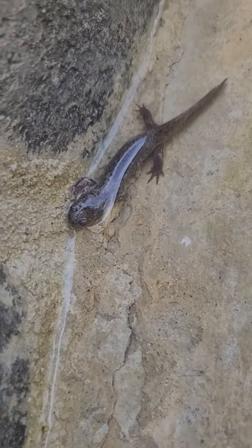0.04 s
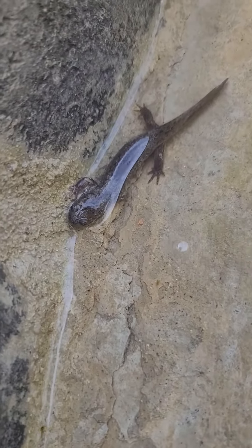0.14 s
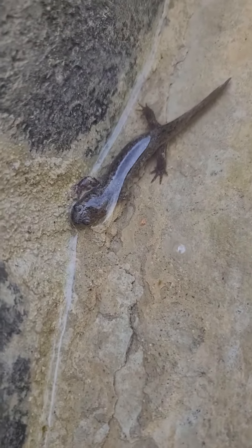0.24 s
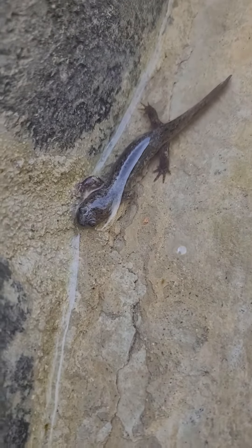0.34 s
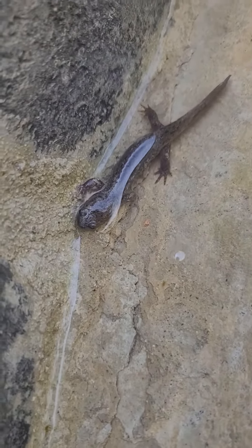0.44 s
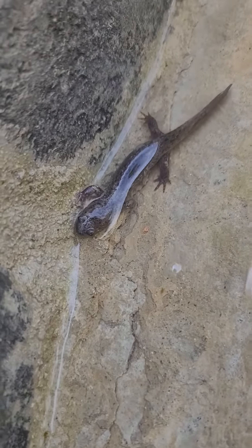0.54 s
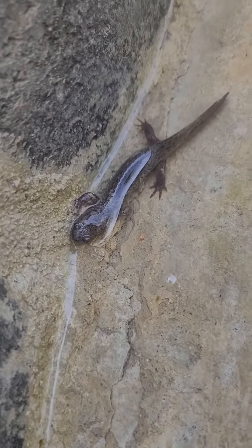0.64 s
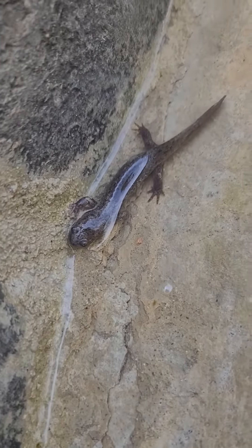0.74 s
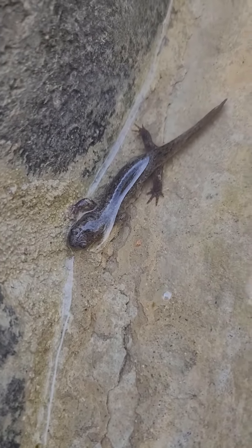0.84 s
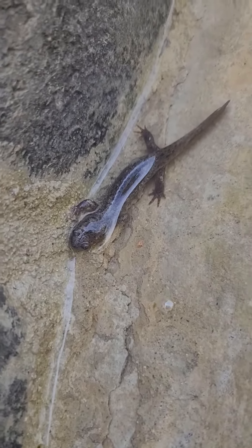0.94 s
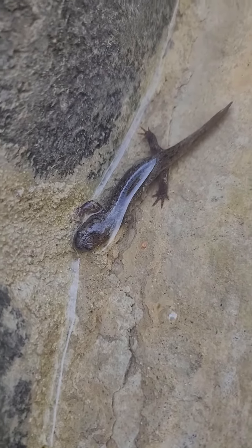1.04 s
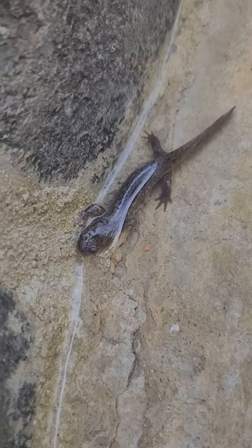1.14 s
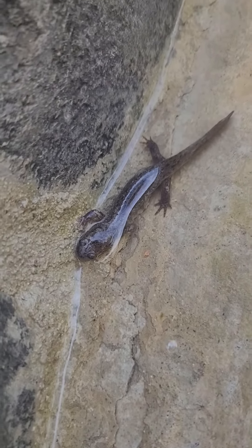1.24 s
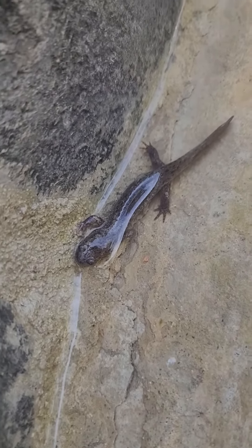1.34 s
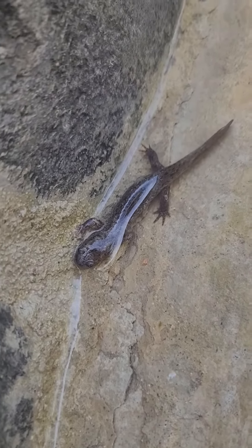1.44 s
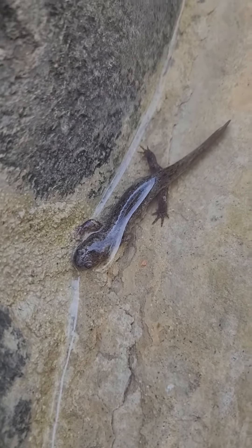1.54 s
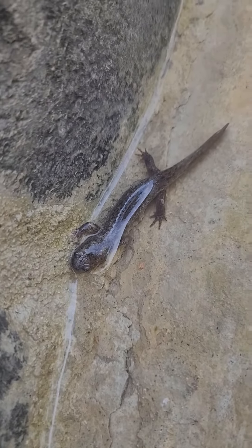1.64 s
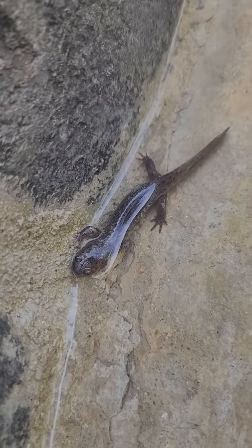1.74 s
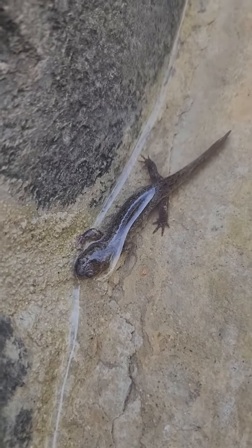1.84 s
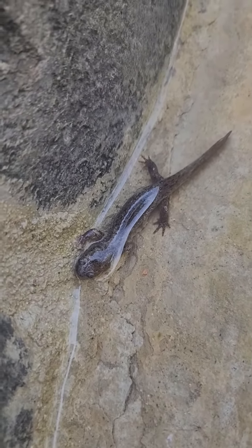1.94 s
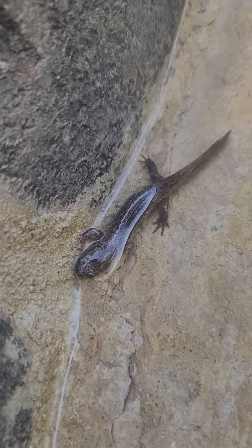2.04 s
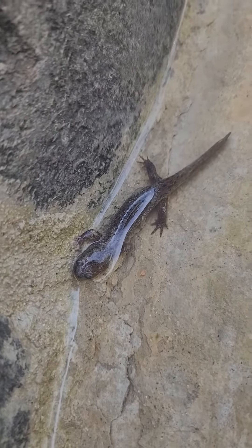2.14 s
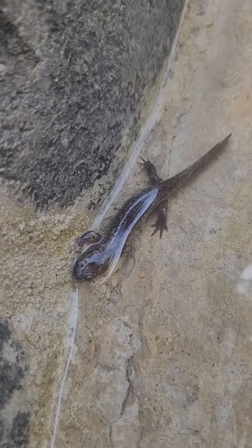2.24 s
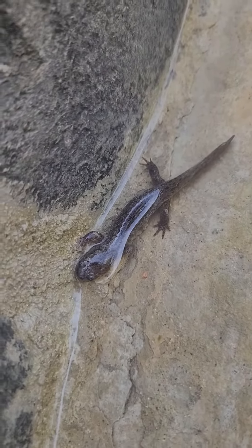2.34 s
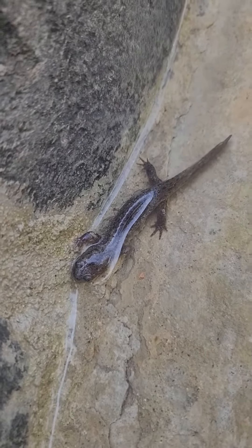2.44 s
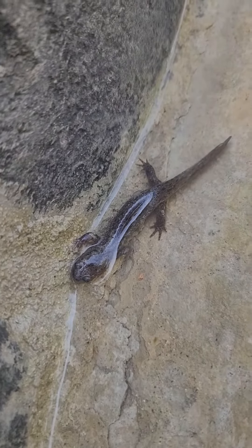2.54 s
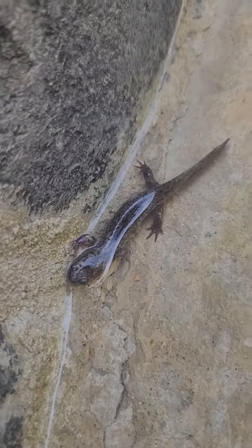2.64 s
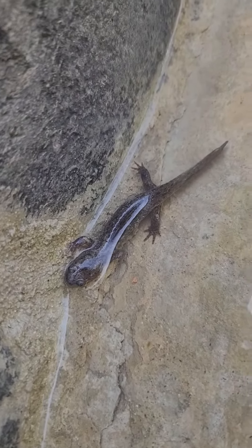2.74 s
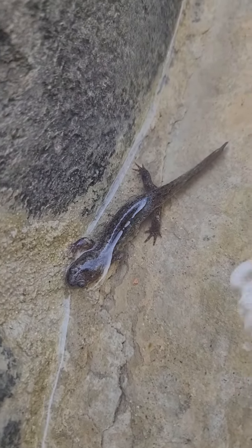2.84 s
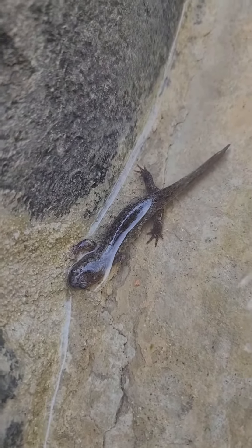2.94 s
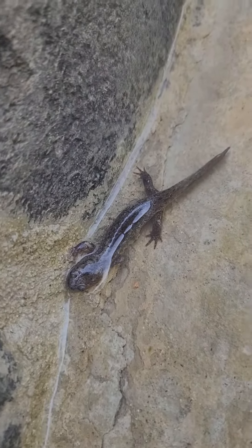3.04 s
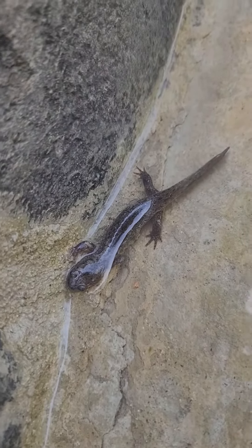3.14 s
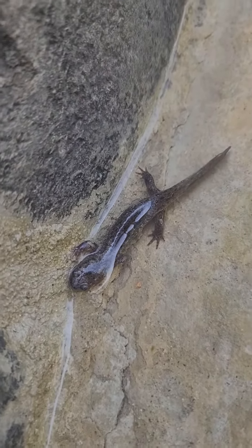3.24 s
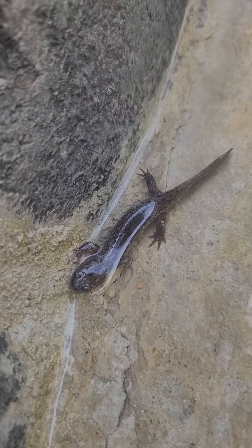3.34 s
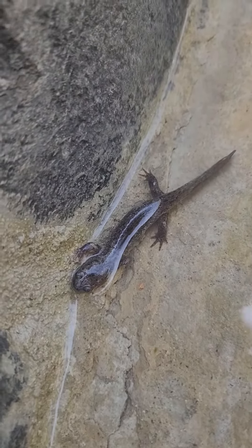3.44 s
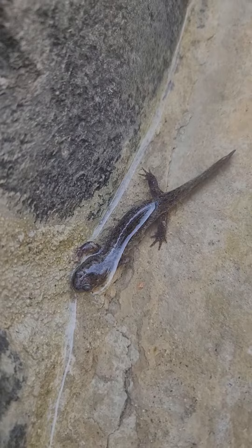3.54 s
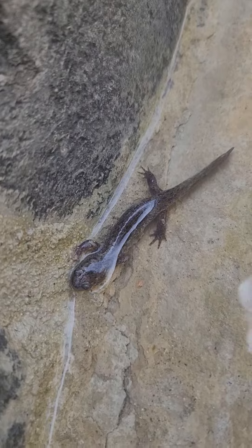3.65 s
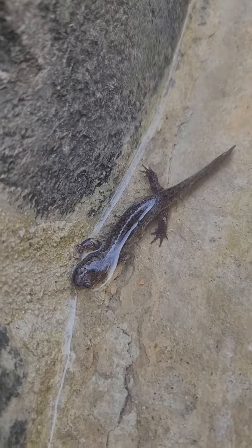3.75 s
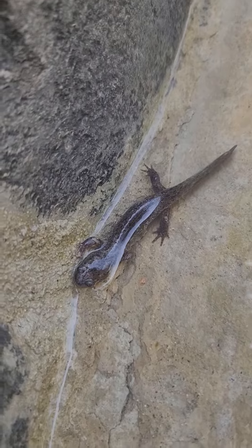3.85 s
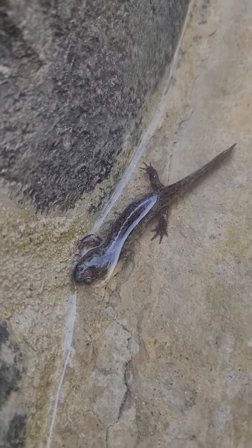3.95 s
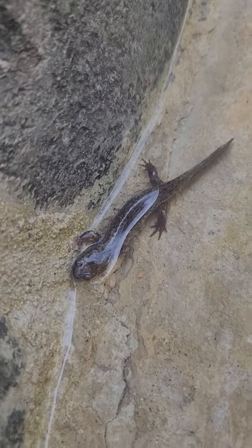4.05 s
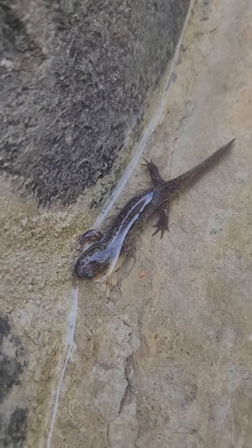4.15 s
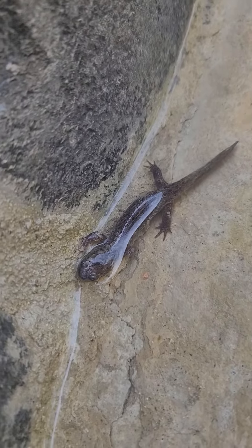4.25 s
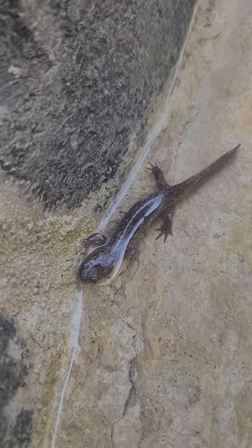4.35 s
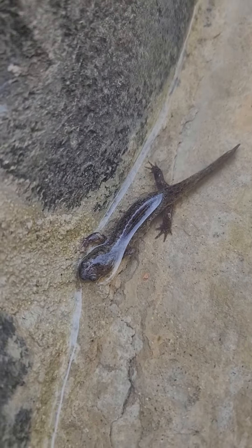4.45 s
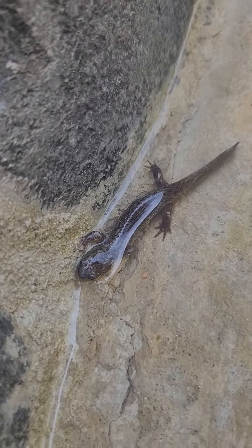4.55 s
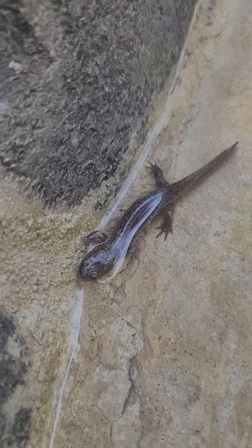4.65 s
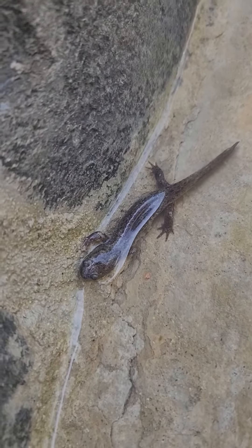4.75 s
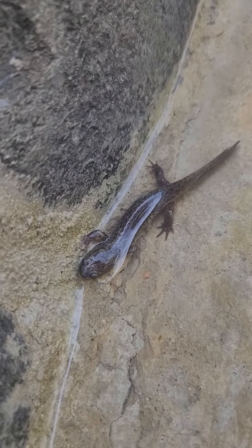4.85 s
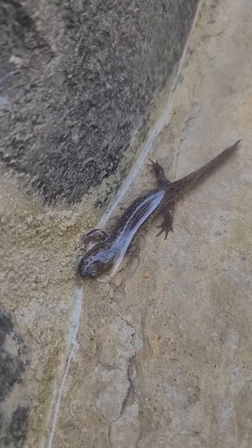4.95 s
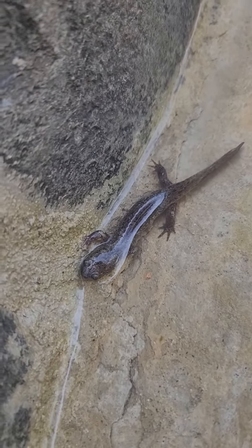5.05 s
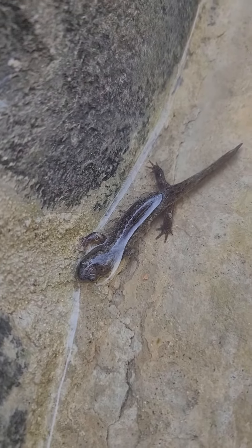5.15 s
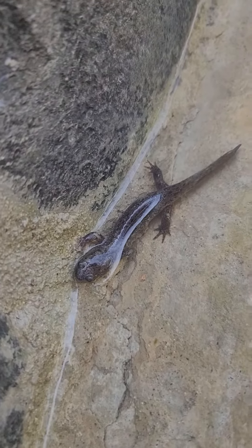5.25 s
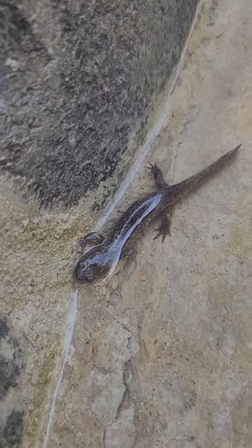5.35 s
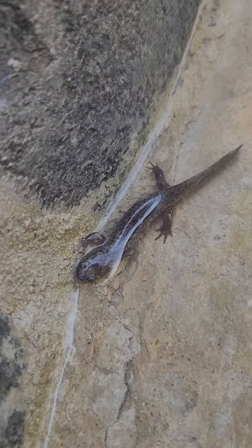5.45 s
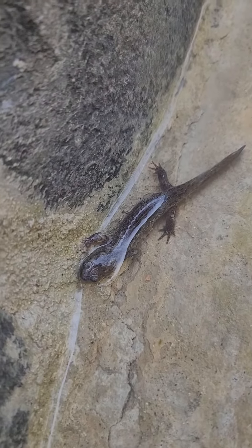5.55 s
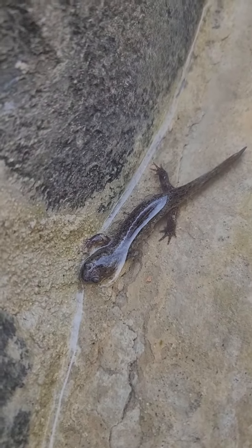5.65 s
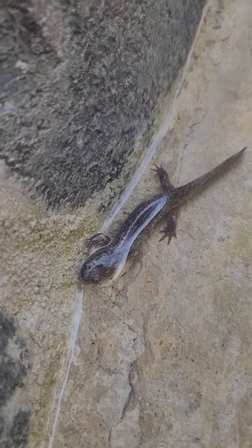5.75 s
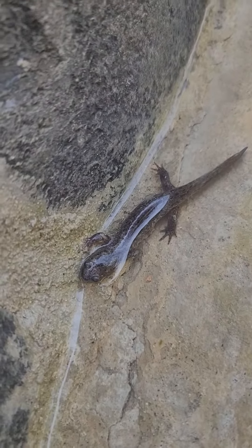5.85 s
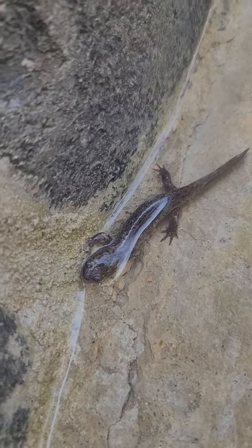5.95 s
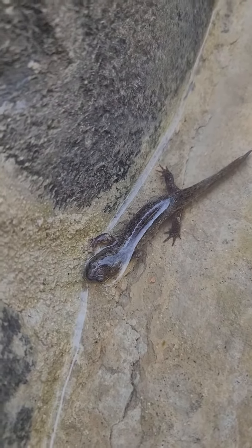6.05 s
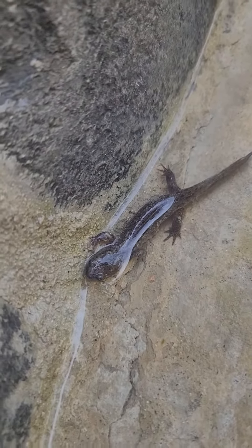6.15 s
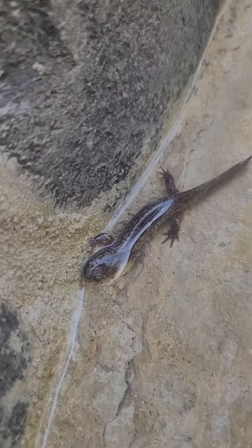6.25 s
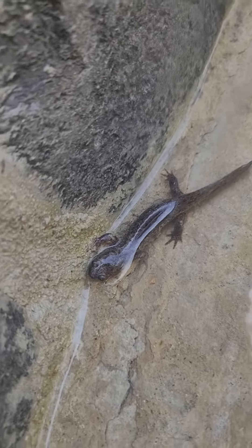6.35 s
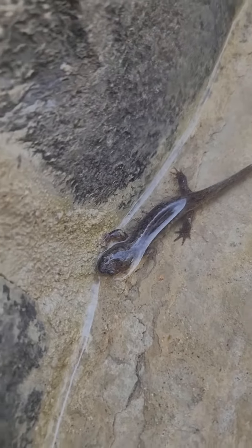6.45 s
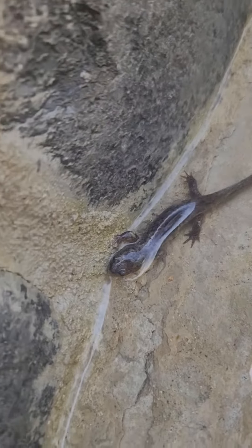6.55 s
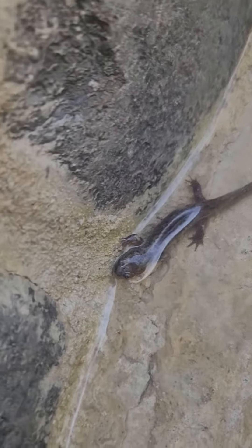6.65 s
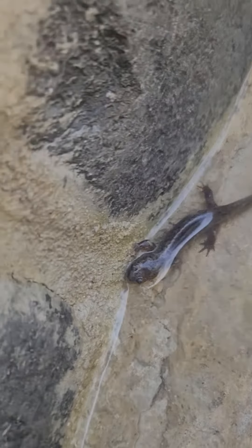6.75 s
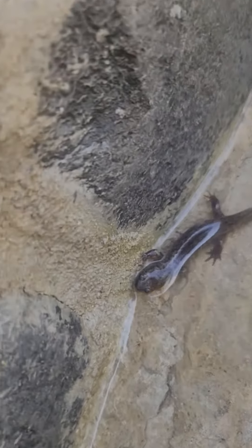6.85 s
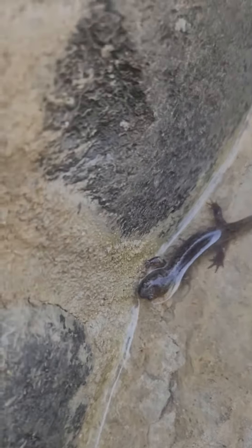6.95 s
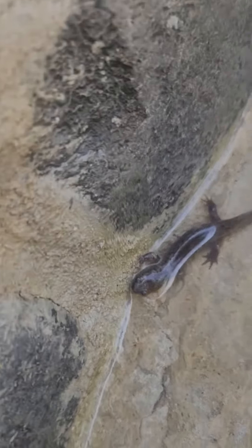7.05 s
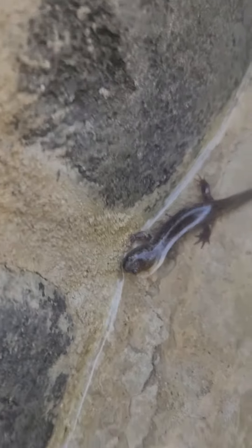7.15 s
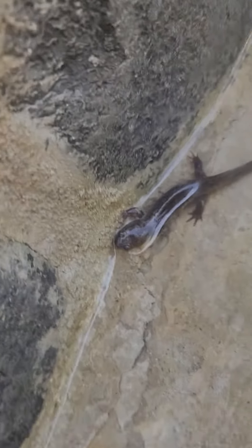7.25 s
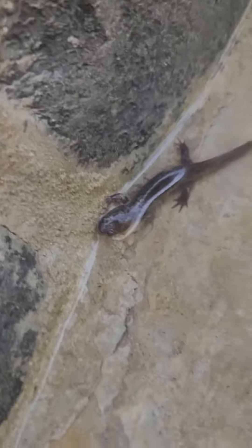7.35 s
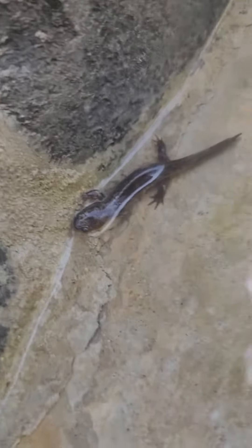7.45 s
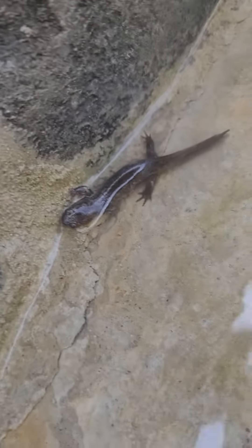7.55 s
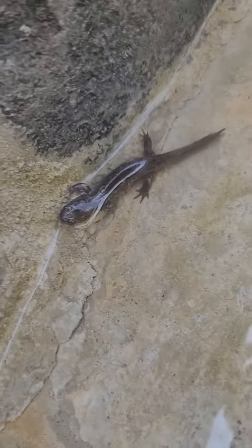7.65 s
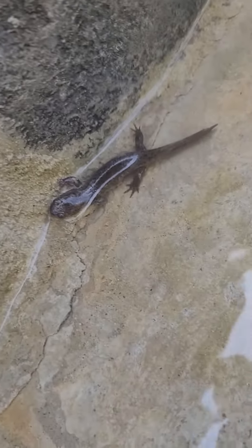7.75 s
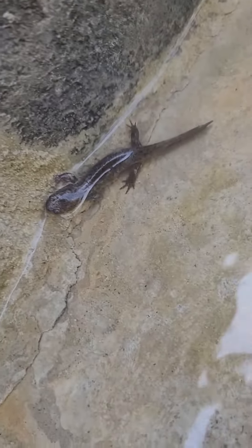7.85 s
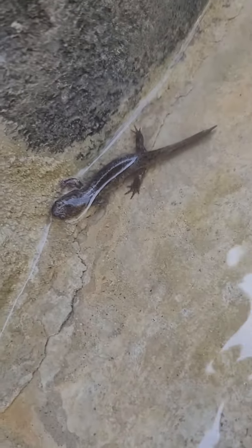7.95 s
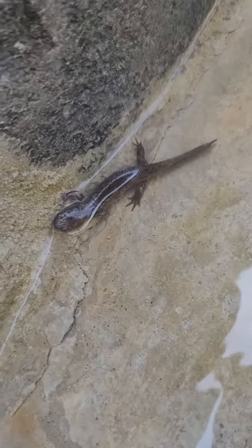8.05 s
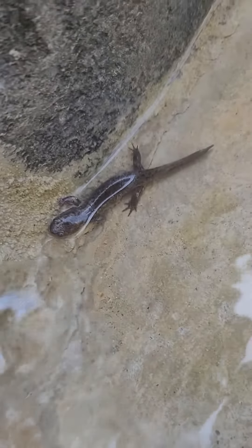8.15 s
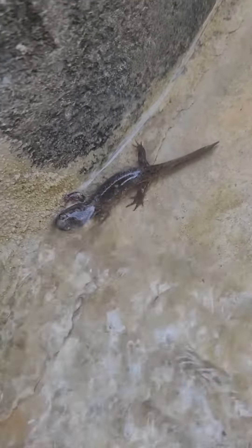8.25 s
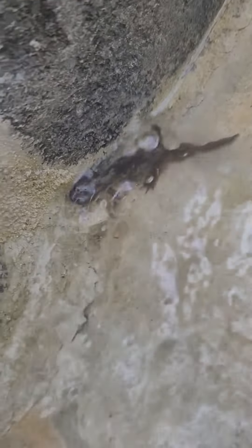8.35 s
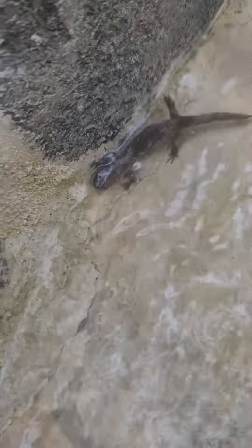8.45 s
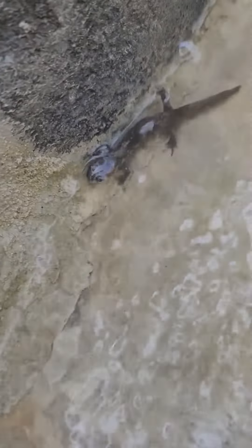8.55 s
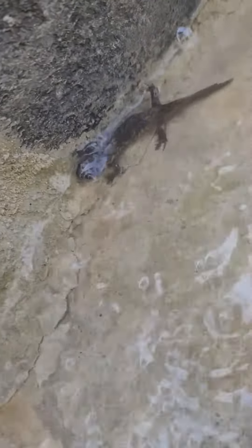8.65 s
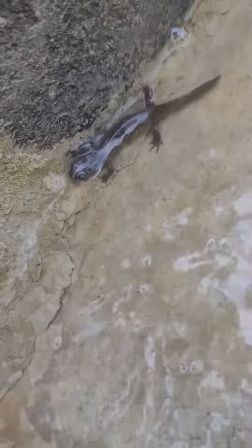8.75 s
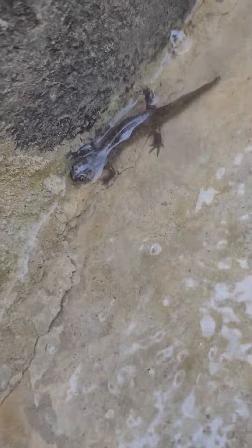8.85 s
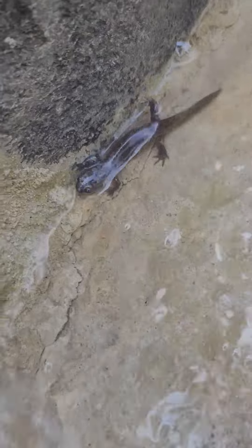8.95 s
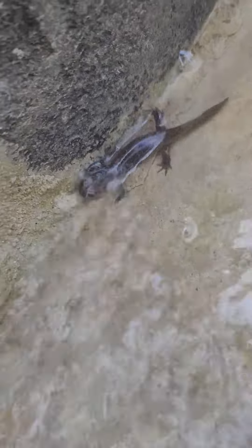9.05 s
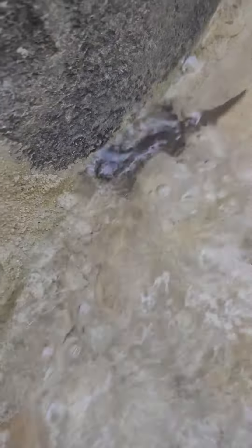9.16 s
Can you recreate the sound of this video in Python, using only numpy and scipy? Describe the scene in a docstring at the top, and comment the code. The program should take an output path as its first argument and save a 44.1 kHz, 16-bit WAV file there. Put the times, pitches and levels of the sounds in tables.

```python
"""Beside a shallow pool under a rock: a spring trickles in some steps away, before far water and moving air.
Drops are ringing sine bubbles with noise ticks and bursts; a near and a far bird sing in gliding whistles.
Cloth hiss swishes near the right port, then two handfuls of water are pushed over the stone, close by:
spray noise, a gurgle of bubbles and one big gulp. A hand-held two-port microphone hears level and delay."""
import sys
import numpy as np
from scipy import signal
from scipy.fft import rfft, irfft, next_fast_len
from scipy.io import wavfile
from scipy.ndimage import uniform_filter1d, map_coordinates

SR = 44100
rng = np.random.default_rng(int(sys.argv[2]) if len(sys.argv) > 2 else 0)


def waveform_to_disk(signal):
    """Save audio, clipped to [-1, 1], as 16-bit WAV at the path in sys.argv[1]."""
    frames = np.transpose(np.atleast_2d(signal))
    scaled = np.clip(frames, -1, 1) * 32767
    samples = np.round(scaled).astype(np.int16)
    wavfile.write(sys.argv[1], SR, samples)


N = 406161

# Far water and air, the part both ports share: f/Hz, relative level/dB [Hz, dB]
STREAM_SHARED = [(15, -47), (30, -23), (75, -1), (200, -1.5), (285, -8), (400, -4), (720, -12), (1000, -22),
                 (1300, -15), (5600, -34), (6900, -24.5), (9500, -42), (16000, -40)]
# Far water and air, the part opposed between the ports: f/Hz, relative level/dB [Hz, dB]
STREAM_OPPOSED = [(15, -50), (25, -4.5), (157, -11), (641, 1), (962, -7.5), (2160, -13.5), (5280, -25.5),
                  (8590, -82), (16000, -66)]
# Puffs of air on the ports: t/s at the middle, level/dB [s, dB]
AIR_PUFFS = [(.89, -57.5), (5.77, -49.5)]
# Colour of the air on the ports: f/Hz, relative level/dB [Hz, dB]
AIR_COLOUR = [(15, -39), (45, 19.5), (90, 21.0), (160, -35), (300, -90)]

# Scatter off wet rock: f/Hz, time to fall 60 dB/s [Hz, s]
ROCK_DECAY = [(500, 0.074), (2500, 0.1), (10000, 0.038)]
# Reverberation among the trees, for the far bird alone and for both: f/Hz, time to fall 60 dB/s [Hz, s]
FAR_TREE_DECAY = [(6000, .2)]
TREE_DECAY = [(3000, 0.42), (7000, 1.0)]

# Bubbles left by single drops: t/s, level/dB before churn, f/Hz, life/s [s, dB, Hz, s]
DROP_BUBBLES = [(0.3786, -45, 3530, 0.0038), (0.4294, -40, 2010, 0.0036), (0.647, -35, 1850, 0.0051),
                (0.667, -40, 2420, 0.0071), (0.696, -43, 2230, 0.0036), (0.766, -44, 3600, 0.0071),
                (0.9825, -43, 2350, 0.0049), (1.0702, -44.5, 2460, 0.0078), (1.2269, -33.5, 1824, 0.0042),
                (1.3682, -37, 2290, 0.004), (2.3256, -45, 2120, .004), (2.591, -46, 1640, 0.0077),
                (2.928, -44, 3040, 0.0029), (2.988, -43, 2180, 0.004), (3.038, -30, 2330, 0.002),
                (3.194, -47, 1973, 0.015), (3.229, -32, 2120, 0.0019), (3.569, -38.5, 4690, 0.0062),
                (3.785, -45, 4620, 0.0054), (3.831, -48, 3125, 0.0071), (3.8868, -49, 1930, 0.0049),
                (3.976, -46, 2140, 0.0032), (4.169, -43, 2400, 0.004), (4.2315, -40.5, 2140, 0.0049),
                (4.416, -38.5, 2130, 0.0043), (4.6934, -38, 2160, 0.0028), (5.0115, -45, 2250, 0.0054),
                (5.0793, -45, 3570, 0.0044), (5.383, -39.5, 2200, 0.0069), (5.392, -43.5, 1363, 0.021),
                (5.632, -36, 2370, 0.0022), (5.992, -28.5, 2340, 0.0028), (6.576, -40, 1475, 0.014),
                (7.954, -28, 3844, 0.0067), (7.964, -29.5, 1360, 0.012), (7.978, -16, 4070, 0.0015),
                (7.9967, -31.5, 2640, 0.0046), (8.004, -36, 1410, .012), (8.066, -25.5, 2180, 0.012),
                (8.066, -16, 750, 0.0075), (8.122, -29.5, 913, 0.015), (8.144, -23, 3150, 0.0084),
                (8.083, -29, 2950, .005), (8.111, -32, 2320, 0.0044), (8.123, -36, 2820, 0.015),
                (8.17, -31, 1410, 0.0091), (8.1801, -10.5, 1066, 0.0038), (8.1815, -10, 2796, 0.0047),
                (8.2411, -30.5, 2900, 0.0053), (8.252, -35, 1520, 0.0071), (8.295, -44.5, 1303, 0.017),
                (8.6032, -23, 1326, 0.0053), (8.696, -13, 2340, 0.001), (8.7262, -12.5, 3810, 0.0017),
                (8.835, -21, 2900, .0027), (8.85, -22.5, 1526, 0.0056), (8.86, -22, 4040, 0.0043),
                (8.9134, -23, 790, 0.0047), (8.947, -28, 3760, 0.0045), (9.016, -25, 4500, .004),
                (9.02, -22, 690, 0.0098), (9.049, -21, 654, 0.0042), (9.032, -13.5, 3220, 0.003),
                (9.055, -20, 2540, 0.0046), (9.066, -17.5, 1820, 0.0048), (9.073, -19, 4370, .003),
                (9.078, -27, 2850, 0.0035), (9.106, -24.5, 1500, 0.0079), (9.176, -34, 3000, .006),
                (9.1641, -28, 4180, 0.0057)]
# Short bursts of noise, mostly drops, a few at the near bird's high strokes:
# t/s, level/dB before crest and colour, band centre f/Hz [s, dB, Hz]
SHORT_BURSTS = [(0.1292, -41, 5300), (0.375, -42, 5730), (0.4595, -38.5, 6100), (0.619, -33.5, 4460),
                (0.7006, -39, 8000), (0.7547, -38.5, 7250), (0.883, -37, 4140), (1.04, -41, 6450),
                (1.54, -38.5, 6800), (1.709, -44, 7350), (1.937, -43.5, 6570), (1.996, -43, 6700),
                (2.0608, -35, 5550), (2.199, -42, 6750), (2.322, -42, 9000), (2.402, -37, 7540),
                (2.6706, -44, 7360), (2.791, -39, 6832), (2.846, -30, 6600), (2.923, -39.5, 6500),
                (3.0405, -38, 6300), (3.127, -37.5, 6060), (3.165, -32.5, 5830), (3.281, -36, 5000),
                (3.569, -36, 5200), (4.2391, -43, 7200), (4.478, -37.5, 6100), (4.6726, -34, 7940),
                (4.735, -33.5, 6900), (4.898, -37, 5470), (5.0285, -41.5, 6700), (5.69, -35, 5160),
                (5.9183, -36, 7560), (6.0552, -31, 6860), (7.308, -37, 6260), (7.707, -23.5, 5700),
                (8.078, -31, 5790), (8.1386, -30.5, 6656), (8.1801, -15, 3600), (8.328, -30.5, 7040),
                (8.602, -37, 5830), (8.6944, -27, 5060), (8.7167, -25, 4430), (8.86, -28, 4700),
                (8.978, -23.5, 3000), (8.27, -36, 6200), (8.428, -36, 4740), (8.483, -37.5, 6500),
                (9.031, -32, 6850), (9.0906, -21.5, 8240), (9.06, -23.5, 6500), (9.077, -28, 7340),
                (9.107, -27, 5500), (9.135, -34, 4850), (8.2, -27, 8000), (8.151, -29, 8900),
                (0.209, -42, 3700), (3.648, -42, 7050), (3.739, -40, 6650), (4.54, -46, 5300)]
# Colour of every burst; the microphone's port lifts 7 kHz: f/Hz, gain/dB [Hz, dB]
BURST_COLOUR = [(600, -15), (1500, 10), (4500, 3), (6900, 7.5), (8500, -0.5), (14000, 8.5), (16000, -22.5)]

# Far bird's thin notes: t/s, level/dB before flutter and placing [s, dB]
FAR_NOTES = [(4.266, -56), (4.449, -54), (4.615, -53), (4.786, -55), (4.94, -72)]
# Near bird's strokes: length/s, turn as part of the stroke, first f/Hz, turn f/Hz, last f/Hz,
# level/dB before throat, fade and flutter, list of starts t/s [s, 0-1, Hz, Hz, Hz, dB, s]
NEAR_PHRASE = [(.036, .4, 4600, 4250, 3900, -47, [1.283, 5.241]),
               (.095, .24, 3550, 3960, 3850, -35, [1.338, 5.294]),
               (.092, .4, 5150, 5520, 4450, -47, [1.61, 5.61]),
               (.03, .45, 7900, 7750, 7250, -49, [1.76, 1.895, 5.78, 5.917]),
               (.012, .5, 3900, 4150, 4450, -47, [1.789, 1.922, 5.809, 5.944]),
               (.044, .8, 3340, 4060, 4700, -38.5, [1.801, 1.934, 5.821, 5.956]),
               (.045, .55, 7340, 5660, 5190, -55, [2.05, 6.053]),
               (.104, .25, 4800, 4130, 2950, -37.5, [2.13, 6.146]),
               (.018, .7, 4250, 4800, 5200, -44, [2.481, 6.478]),
               (.036, .3, 5200, 3900, 3900, -40, [2.494, 6.491]),
               (.028, .6, 3280, 3400, 4020, -42, [2.532, 6.529])]
# What the near bird's throat favours: f/Hz, gain/dB [Hz, dB]
THROAT_COLOUR = [(2500, -12), (3200, -8), (4000, 1.5), (5500, -1.5), (8000, 4)]

# A sleeve slides: start t/s, length/s, stroke level/dB [s, s, dB]
SLEEVE_STROKES = [(6.58, 0.8, -49.5), (7.348, 0.44, -53.5)]
# Colour of the cloth: f/Hz, relative level/dB [Hz, dB]
CLOTH_COLOUR = [(130, -16), (220, -3.5), (293, -5), (398, 3), (941, -19), (3240, -12), (6890, -17),
                (14600, -28), (16000, -42)]

# Colour of pushed spray: f/Hz, relative level/dB [Hz, dB]
SPRAY_COLOUR = [(240, -31), (400, -28), (730, -17.5), (1490, -11), (2250, -6.5), (13700, -19), (16000, -24)]
# Handfuls of water: t/s at full flow, hold/s, flow gain/dB before the drain adds to it [s, s, dB]
HANDFULS = [(8.096, 0.089, -33.5), (9.023, 0.055, -28)]
# The hand settles on stone: t/s, level/dB, f/Hz, life/s [s, dB, Hz, s]
HAND_KNOCKS = [(7.478, -34, 417, 0.005), (7.4945, -33.5, 378, 0.005)]
# Air pockets squeezed or stretched by the water: t/s, length/s, first f/Hz, last f/Hz,
# level/dB before roughening [s, s, Hz, Hz, dB]
SLIDING_POCKETS = [(8.047, 0.024, 964, 1410, -27.5), (8.866, 0.023, 1664, 2330, -29.5),
                   (8.924, 0.0345, 1307, 696, -28), (8.978, 0.068, 1650, 1200, -26)]
# One big pocket of air closes slowly: t/s, level/dB, f/Hz, life/s [s, dB, Hz, s]
BIG_POCKET = [(9.05, -3.5, 1234, 0.0353)]

SPRING_AT, HAND_AT = (3.4, -0.565), (-3.5, 0.56)  # places: left over right in dB, left lag in ms
HAND_IN_S = 7.6  # listed bubbles and bursts after this belong to the pushed water
IMPACT_DB, HAND_IMPACT_DB = 1.5, -6.5  # tick against its bubble: spring, pushed water
TOP_HZ = 15600  # band limit


def amp(db):
    """Decibels to linear gain."""
    return 10 ** (np.asarray(db) / 20)


def unit(x):
    """Scales to rms 1."""
    return x / np.sqrt(np.mean(x ** 2) + 1e-20)


def along(points, hz):
    """Reads (Hz, value) points on a log frequency axis."""
    f, v = np.transpose(points)
    return np.interp(np.log(hz + 1), np.log(f + 1), v)


def wobble(rate):
    """A smooth random curve with rate knots a second."""
    knots = rng.standard_normal(int(N * rate / SR) + 4)
    return map_coordinates(knots, [np.arange(N) * rate / SR])


def filtered(x, response):
    """Multiplies the spectrum of x by a complex response of frequency."""
    m = next_fast_len(N + SR // 2)
    return irfft(rfft(x, m) * response(np.fft.rfftfreq(m, 1 / SR)), m)[..., :N]


def hiss(colour, patchy_db):
    """Coloured noise of rms 1, with patches of random gain in time and frequency."""
    z = signal.stft(rng.standard_normal(N), nperseg=256)[2]
    field = uniform_filter1d(rng.standard_normal(z.shape), 4, 0)
    field = uniform_filter1d(field, 6, 1)
    patchy = signal.istft(z * amp(patchy_db * unit(field)), nperseg=256)[1][:N]
    return unit(filtered(patchy, lambda hz: amp(along(colour, hz))))


def placed(x, pan_db, lag_ms):
    """One source at two ports: a level step and a delay, half on each side."""
    side = np.array([[.5], [-.5]])
    return filtered(amp(side * pan_db) * x, lambda hz: np.exp(-2j * np.pi * hz * side * lag_ms / 1000))


def ports(s, pan_db, lag_ms, wave, size):
    """Short sounds, one a row, laid out for both ports; wave(t) gives their shapes."""
    first = np.round(s * SR).astype(int) + np.arange(size) - 32  # room for the earlier port
    out = []
    for side in (.5, -.5):
        t = np.maximum(first / SR - s - side * lag_ms / 1000, 0)
        samples = amp(side * pan_db) * wave(t)
        out.append(np.bincount(np.clip(first, 0, N).ravel(), samples.ravel(), N + 1)[:N])
    return np.array(out)


def echoes(x, decay, seconds):
    """A diffuse answer from decaying noise, one for each port; each frequency dies at its own speed."""
    hz, t, z = signal.stft(rng.standard_normal((2, int(seconds * SR))), SR, nperseg=128)
    fall = amp(-60 * t / along(decay, hz)[:, None])
    tail = signal.istft(z * fall, SR, nperseg=128)[1]
    return signal.fftconvolve(x, tail / np.linalg.norm(tail[0]), axes=1)[:, :N]


def seated(rows, place, scatter_db):
    """Adds left-right dB and lag to each row, the dB scattered round one place."""
    pan_db = place[0] + scatter_db * rng.standard_normal((len(rows), 1))
    return np.hstack([rows, pan_db, place[1] + 0 * pan_db])


def bubbles(rows, rise, soft, size):
    """Each bubble swells and dies as a sine whose pitch climbs while it nears the surface."""
    s, db, hz, life, pan_db, lag_ms = np.transpose(rows)[:, :, None]

    def wave(t):
        age = t / (0.29 * life)  # 1 at the peak
        swell = (age * np.exp(1 - age)) ** soft
        bend = 1 + rise * (np.minimum(age, 6) / 2 - 1)
        return amp(db) * swell * np.sin(2 * np.pi * hz * t * bend)

    return ports(s, pan_db, lag_ms, wave, size)


def bursts(s, db, pan_db, fade, centre_hz, swell):
    """Puffs of noise that fade in a few milliseconds, each strongest in a band of its own."""
    octaves = np.log2((np.fft.rfftfreq(1600, 1 / SR) + 1) / centre_hz[:, None])
    band = amp(-np.minimum(60 * octaves ** 2, 21))
    crack = irfft(rfft(rng.standard_normal((len(s), 1600))) * band)

    def wave(t):
        envelope = (1 - np.exp(-t / swell)) ** 3 * np.exp(-t / fade[:, None])
        return amp(db)[:, None] * envelope * crack

    puffs = ports(s[:, None], pan_db[:, None], 0, wave, size=1600)
    return filtered(puffs, lambda hz: amp(along(BURST_COLOUR, hz)))


def ticking(rows, rise, soft, size, impact_db=IMPACT_DB):
    """Bubbles, each with the noise tick of the drop that made it."""
    s, db, hz, pan_db = rows[:, 0], rows[:, 1], rows[:, 2], rows[:, 4]
    ticks = bursts(s, db + impact_db, pan_db, 0.0018 + 0 * s, 1.68 * hz, swell=0.00078)
    return bubbles(rows, rise, soft, size) + ticks


def shower(count, start, pitch_hz, spread, cycles, db, step_db, pan_db, lag_ms):
    """Rows of chance bubbles: few loud and many soft, high-pitched ones tending to be short."""
    u, g = rng.random((count, 3)), rng.standard_normal((count, 3))
    s = start + u[:, 0] * (N / SR - start)
    hz = np.clip(pitch_hz * np.exp(spread * g[:, 0]), 500, 12000)
    level_db = db - step_db * np.log(np.maximum(u[:, 1], .06))
    life = cycles * np.exp(.5 * g[:, 1]) / hz
    return np.transpose([s, level_db, hz, life, pan_db + 4 * g[:, 2], lag_ms + 0.15 * (u[:, 2] - .5)])


def drops(near, place, scatter_db, pan_db, soft):
    """The listed bubbles and short bursts, either up to the time of the pushed water or after it."""
    listed = [row for row in DROP_BUBBLES if (row[0] > HAND_IN_S) == near]
    rows = seated(listed, place, scatter_db)
    s, db, hz = np.transpose([row for row in SHORT_BURSTS if (row[0] > HAND_IN_S) == near])
    crest_db = 10.5  # a short puff peaks below its noise
    churn = amp(2.5 * wobble(260))  # moving water shakes each bubble's ring
    impact_db = HAND_IMPACT_DB if near else IMPACT_DB
    rings = churn * ticking(rows, rise=0.014, soft=soft, size=2600, impact_db=impact_db)
    swell = 0.001 if near else 0.0025  # s
    return rings + bursts(s, db + crest_db, pan_db + 0 * s, 0.0031 + 0 * s, hz, swell)


def stream():
    """Far water and air as steady hiss, shared and opposed at the ports, with low puffs of air."""
    mid = amp(-53.0) * hiss(STREAM_SHARED, patchy_db=1.5)
    side = amp(-52.5) * hiss(STREAM_OPPOSED, patchy_db=1.5)
    t, puff_s = np.arange(N) / SR, 0.077
    puffs = sum(amp(db) * np.exp(-((t - s) / puff_s) ** 2) for s, db in AIR_PUFFS)
    calm = amp(-60 + 3.5 * wobble(2.22))
    air = (puffs + calm) * hiss(AIR_COLOUR, patchy_db=-0.5)
    return amp([[-.7], [.7]]) * np.array([mid + side, mid - side]) + air


def patter(count, clumps):
    """Many small drops burst all the time, in loose clumps of shared level and pitch band."""
    u, g = rng.random((count, 3)), rng.standard_normal((count, 3))
    clump = (u[:, 0] * clumps).astype(int)
    clump_at = (clump + rng.random(clumps)[clump]) / clumps * N / SR
    s = np.abs(clump_at + .014 * g[:, 0])
    clump_db = -55 + 3 * rng.standard_normal(clumps)[clump]
    level_db = clump_db - 5.24 * np.log(np.maximum(u[:, 1], .04))
    clump_log_pitch = 0.37 * rng.standard_normal(clumps)[clump]  # natural log of the pitch ratio
    centre_hz = np.minimum(5000 * np.exp(clump_log_pitch + 0.19 * g[:, 2]), 9000)
    return bursts(s, level_db, -1 + 3 * g[:, 1], 0.0015 + 0.0041 * u[:, 2], centre_hz, swell=0.0016)


def trickle():
    """The spring, some steps away: drops, small bubbles and patter, scattered by the rock."""
    small = shower(count=1300, start=0, pitch_hz=3000, spread=0.5046, cycles=6.75,
                   db=-62.5, step_db=4.5, pan_db=2.0, lag_ms=-0.548)
    single = drops(False, SPRING_AT, scatter_db=-1.0, pan_db=-1.5, soft=0.62)
    unrest = amp(3.6 * wobble(200) + 2.5 * wobble(12))
    fizz = unrest * ticking(small, rise=0.018, soft=0.42, size=1000)
    gushes = amp(4 * wobble(7.1))
    water = single + fizz + gushes * patter(count=1000, clumps=260)
    return water + echoes(water, ROCK_DECAY, seconds=0.26)


def far_bird():
    """Thin whistled notes, each a swelling sine whose pitch sags."""
    song = np.zeros(N)
    note_hz, note_s, sag = 6150, 0.11, .085
    u = np.arange(0, note_s, 1 / SR) / note_s
    phase = 2 * np.pi * note_hz * np.cumsum(1 - sag * u) / SR
    note = np.sin(np.pi * np.sqrt(u)) ** 1.9 * np.sin(phase)
    for s, db in FAR_NOTES:
        song[round(s * SR):][:len(u)] = amp(db) * note
    return song


def near_bird():
    """A phrase sung twice: sines glide through a turning pitch, coloured by the throat."""
    song = np.zeros(N)
    away_s, away_db_s = 5.06, -3  # from this time on the bird turns away and fades, dB a second
    for length, turn, first_hz, turn_hz, last_hz, db, starts in NEAR_PHRASE:
        u = np.arange(0, length, 1 / SR) / length
        bent_hz = np.interp(u, [0, np.clip(turn, 0, 1), 1], [first_hz, turn_hz, last_hz])
        hz = uniform_filter1d(bent_hz, size=len(u) // 5, mode="nearest")
        tone = np.sin(np.pi * u ** 1.02) ** 0.58 * np.sin(2 * np.pi * np.cumsum(hz) / SR)
        for s in starts:
            song[round(s * SR):][:len(u)] += amp(db + away_db_s * max(s - away_s, 0)) * tone
    return filtered(song, lambda hz: amp(along(THROAT_COLOUR, hz)))


def birds():
    """Both birds reach the ports with fluttering level; the trees hold them longer than the rock."""
    flutter_db = wobble(140)  # moving leaves and air roughen the path
    far = amp(5.2 * flutter_db) * placed(far_bird(), pan_db=-8.0, lag_ms=0)
    far = far + amp(-6) * echoes(far, FAR_TREE_DECAY, seconds=.4)
    near = amp(2.9 * flutter_db) * placed(near_bird(), pan_db=-4.0, lag_ms=-0.193)
    both = near + far
    trees = amp(-17.0) * echoes(both, TREE_DECAY, seconds=0.65)
    return both + trees + amp(-5) * echoes(both, ROCK_DECAY, seconds=.3)


def sleeve():
    """Cloth rubs on cloth near the right port: hiss under a rounded swell for each stroke."""
    near = placed(hiss(CLOTH_COLOUR, patchy_db=3.5), pan_db=-8.5, lag_ms=0.583)
    wide = np.array([hiss(CLOTH_COLOUR, patchy_db=0.5), hiss(CLOTH_COLOUR, patchy_db=-6.5)])
    t, stroke = np.arange(N) / SR, 0
    for s, length, db in SLEEVE_STROKES:
        stroke = stroke + amp(db) * np.sin(np.pi * np.clip((t - s) / length, 0, 1)) ** 0.75
    return stroke * (near + amp(1.5) * wide)


def slides():
    """Squeezed or stretched air pockets: rough rings whose pitch glides from first to last."""
    s, length, first_hz, last_hz, db = np.transpose(SLIDING_POCKETS)[:, :, None]

    def wave(t):
        u = np.minimum(t / length, 1)
        mean_hz = first_hz + (last_hz - first_hz) * u / 2  # mean pitch since the start
        return amp(db) * np.sin(np.pi * u ** 0.75) * np.sin(2 * np.pi * t * mean_hz)

    return amp(3 * wobble(300)) * ports(s, *HAND_AT, wave, size=2800)


def surge():
    """Gain of the pushed water: the flow builds, breaks off, and a rest drains away."""
    rise_db_s, fall_db_s, drain_db, drain_db_s = 94.5, 406, -12.5, 24
    t, gain = np.arange(N) / SR, 0
    for s, hold, db in HANDFULS:
        after = np.maximum(t - s - hold, 0)
        rest = amp(-fall_db_s * after) + amp(drain_db - drain_db_s * after)
        gain = gain + amp(db - rise_db_s * np.maximum(s - t, 0)) * rest
    return gain


def splash():
    """Water pushed close by: spray with a dense gurgle of bubbles, drops, hand knocks and a gulp."""
    rows = shower(count=5000, start=7.75, pitch_hz=1496, spread=0.648, cycles=3.65,
                  db=-19.5, step_db=2.5, pan_db=-2, lag_ms=0.67)
    gurgle = bubbles(rows, rise=0.066, soft=0.58, size=900)
    near = placed(hiss(SPRAY_COLOUR, patchy_db=9.5), pan_db=-8.0, lag_ms=0.553)
    wide = np.array([hiss(SPRAY_COLOUR, patchy_db=9), hiss(SPRAY_COLOUR, patchy_db=7.5)])
    flow = surge() * (gurgle + amp(-6.0) * near + amp(-5.0) * wide)
    single = drops(True, HAND_AT, scatter_db=2, pan_db=-8, soft=1.06)
    knocks = bubbles(seated(HAND_KNOCKS, HAND_AT, 0), rise=0.0093, soft=0.92, size=900)
    water = single + flow + slides() + knocks
    gulp = bubbles(seated(BIG_POCKET, HAND_AT, 0), rise=0.28, soft=10, size=2600)
    return water + gulp + amp(-6) * echoes(water + amp(-3) * gulp, ROCK_DECAY, seconds=0.27)


def scene():
    """All layers at the two ports, from the far water to the hand."""
    return stream() + trickle() + birds() + sleeve() + splash()


def record(dry):
    """The microphone rounds peaks off towards 0.9 of full scale and cuts steeply at the band limit."""
    rounded = dry / (1 + np.abs(dry / .9) ** 4) ** (1 / 4)
    return filtered(rounded, lambda hz: 1 / (1 + (hz / TOP_HZ) ** 120))


dry = scene()
out = record(dry)
waveform_to_disk(out)
```